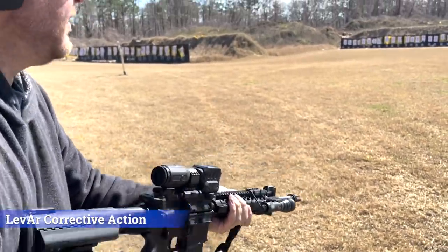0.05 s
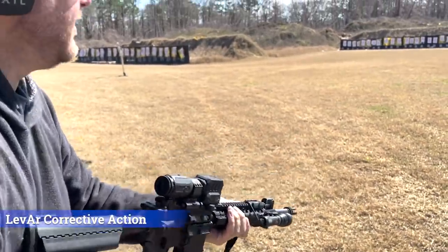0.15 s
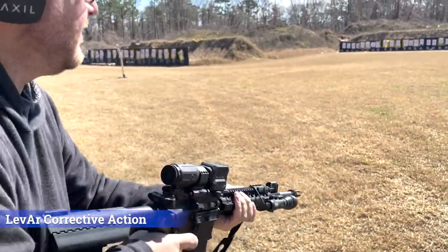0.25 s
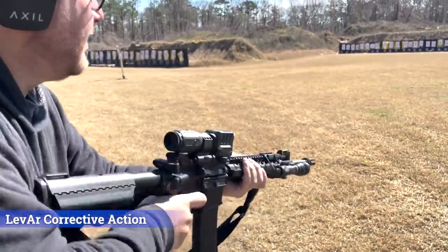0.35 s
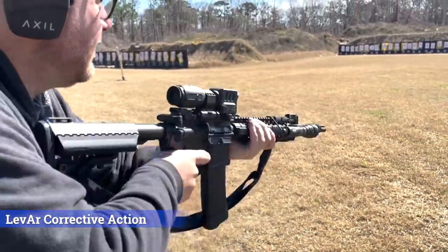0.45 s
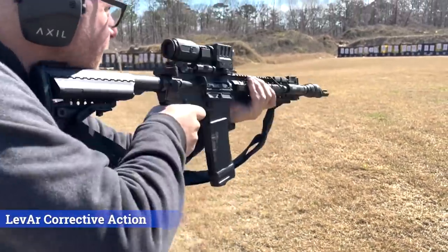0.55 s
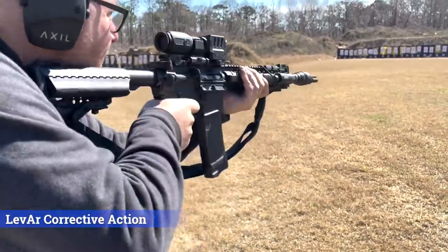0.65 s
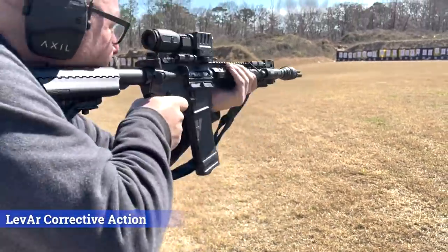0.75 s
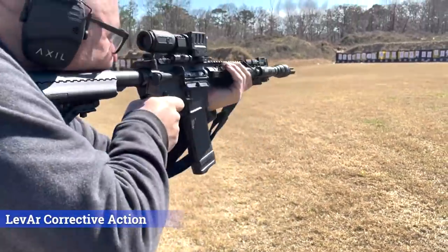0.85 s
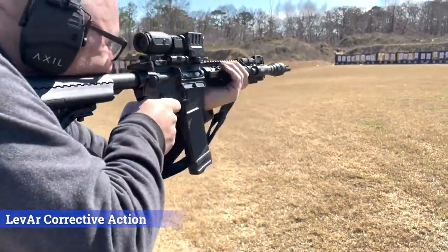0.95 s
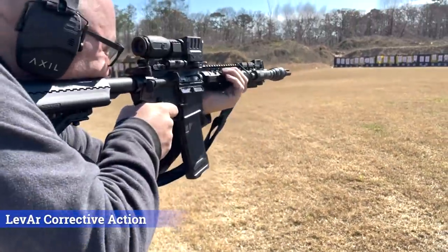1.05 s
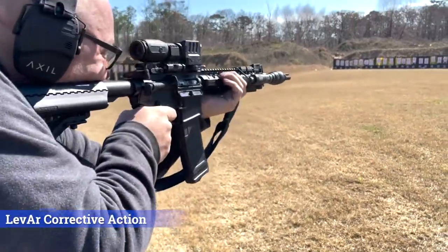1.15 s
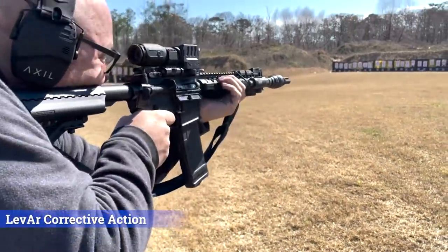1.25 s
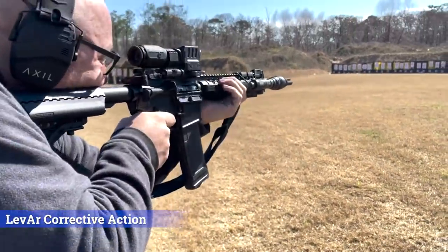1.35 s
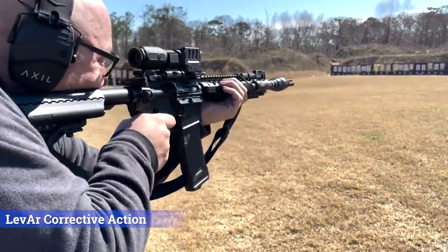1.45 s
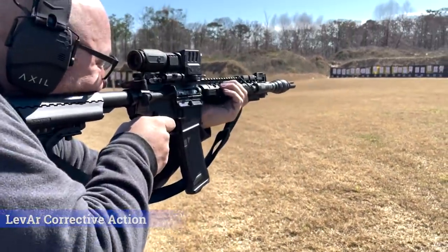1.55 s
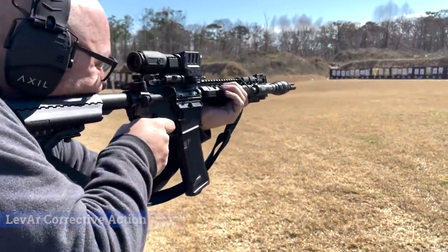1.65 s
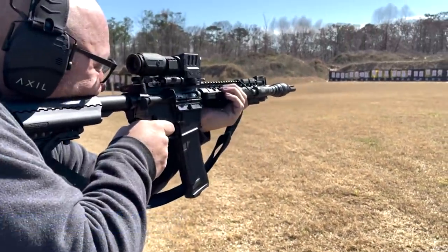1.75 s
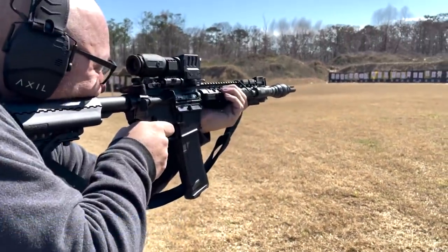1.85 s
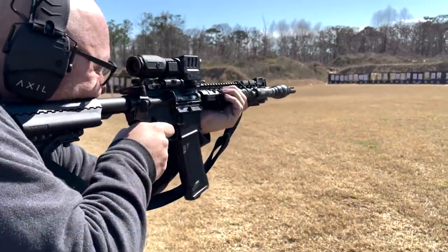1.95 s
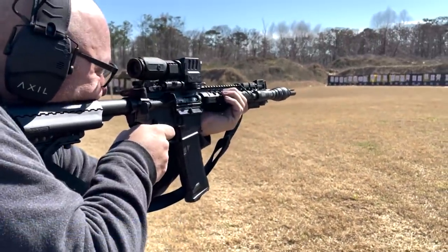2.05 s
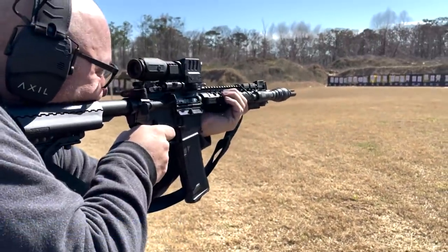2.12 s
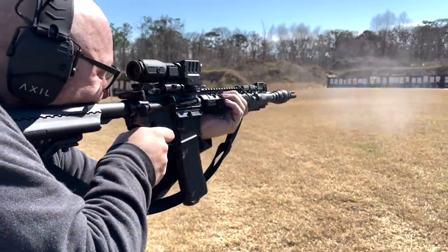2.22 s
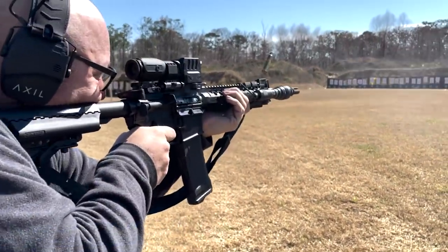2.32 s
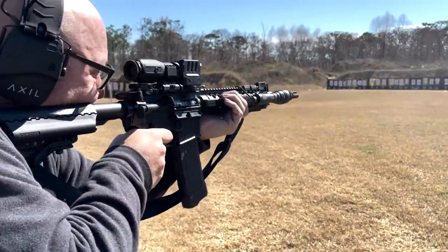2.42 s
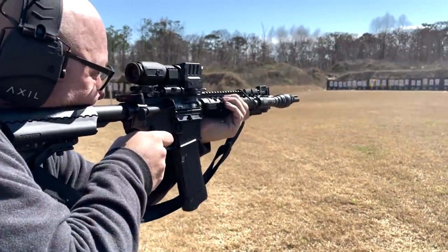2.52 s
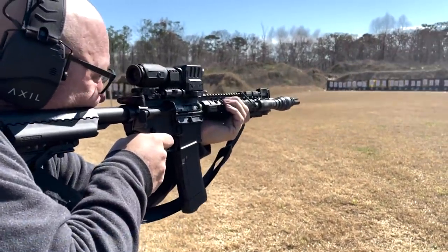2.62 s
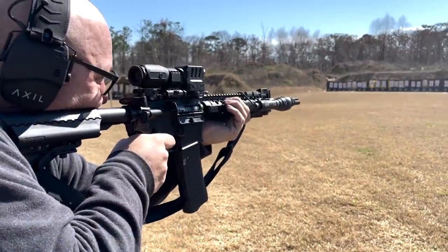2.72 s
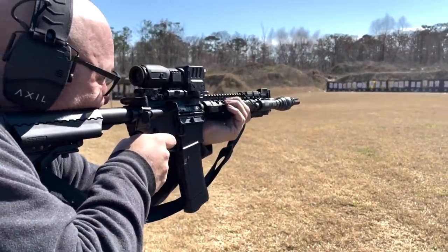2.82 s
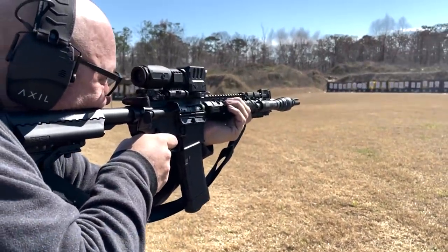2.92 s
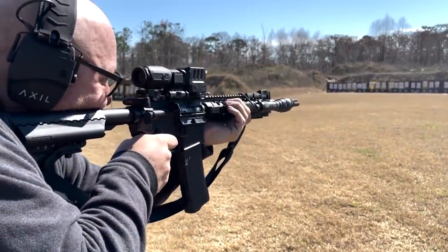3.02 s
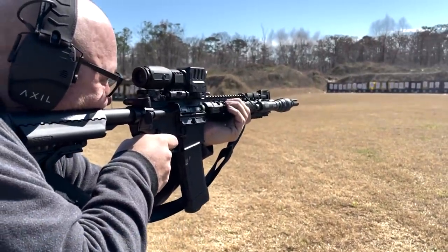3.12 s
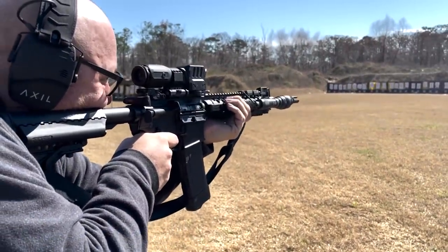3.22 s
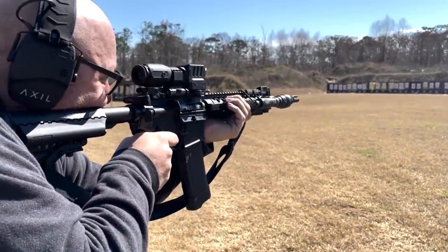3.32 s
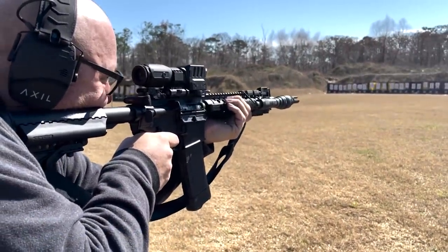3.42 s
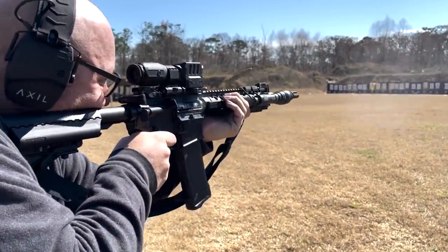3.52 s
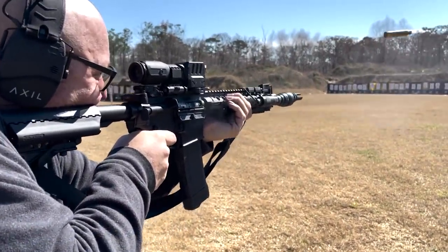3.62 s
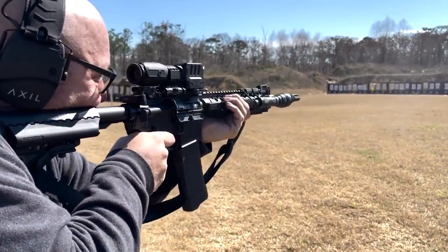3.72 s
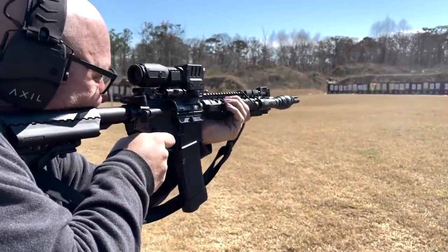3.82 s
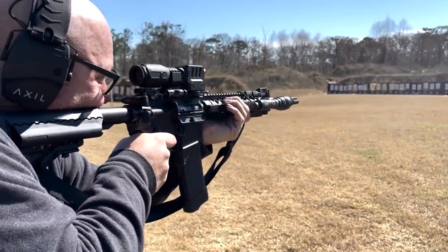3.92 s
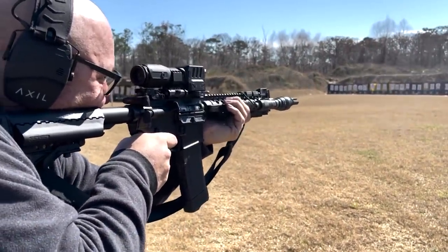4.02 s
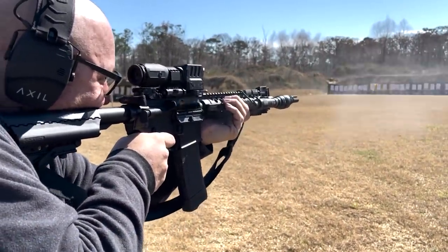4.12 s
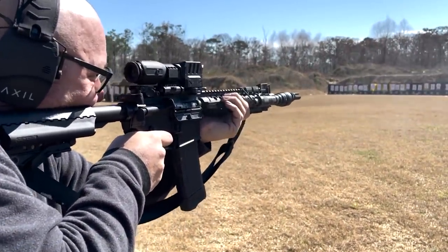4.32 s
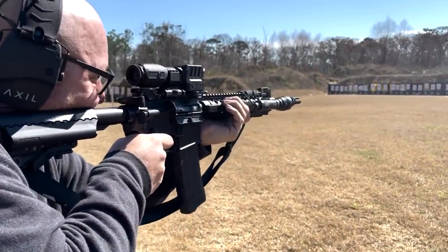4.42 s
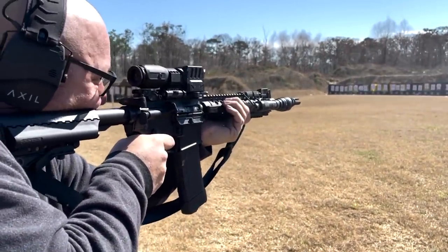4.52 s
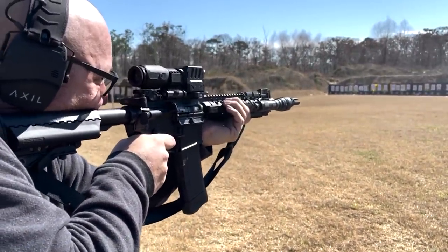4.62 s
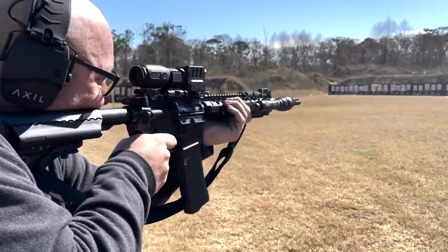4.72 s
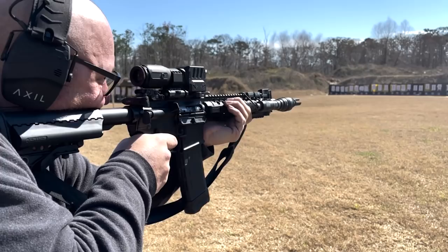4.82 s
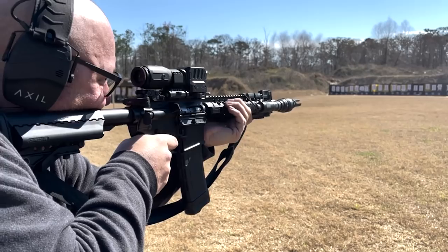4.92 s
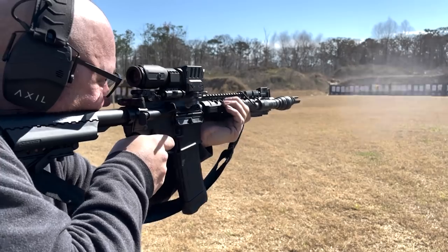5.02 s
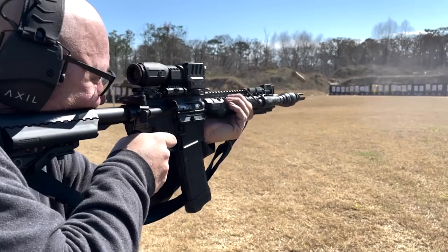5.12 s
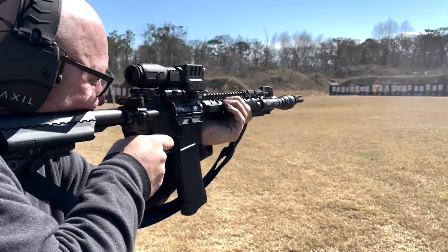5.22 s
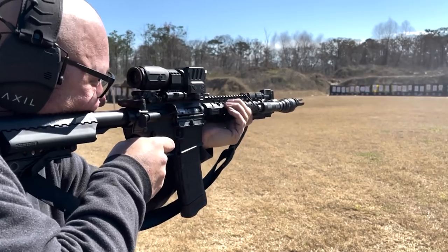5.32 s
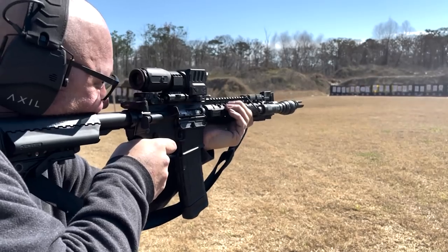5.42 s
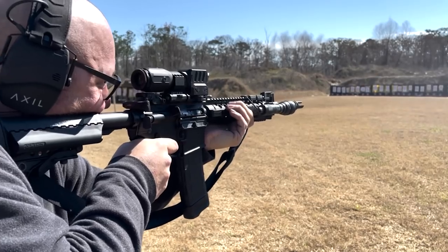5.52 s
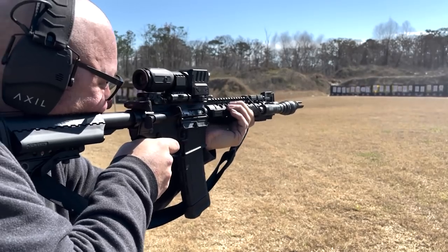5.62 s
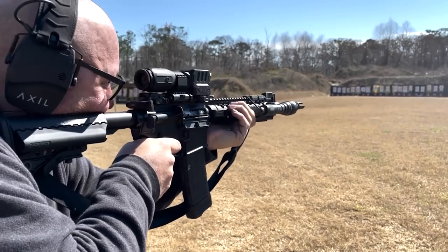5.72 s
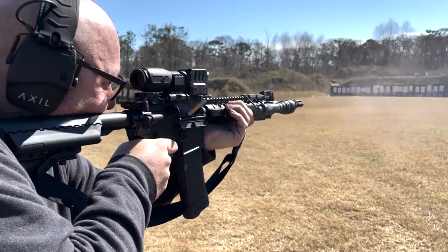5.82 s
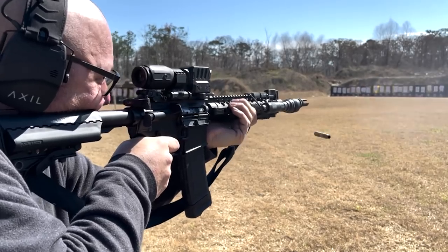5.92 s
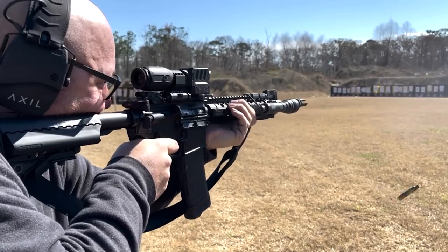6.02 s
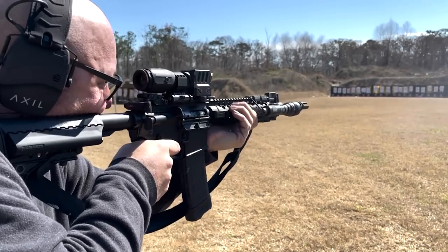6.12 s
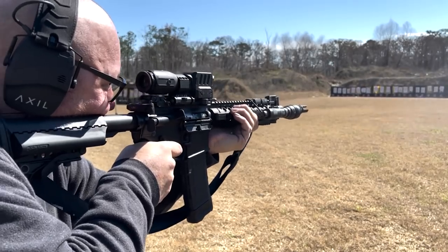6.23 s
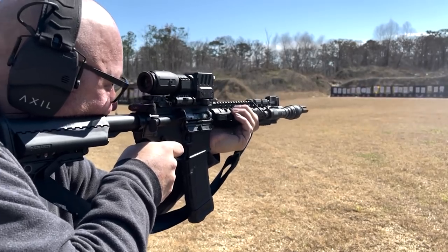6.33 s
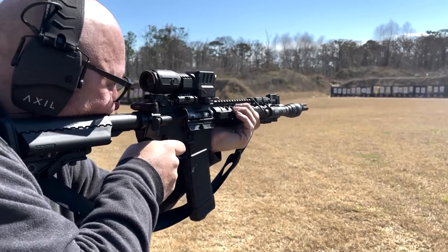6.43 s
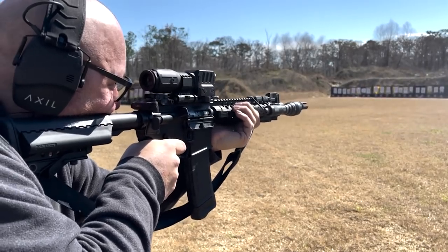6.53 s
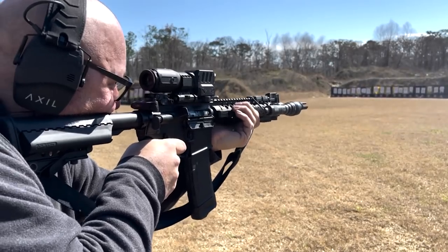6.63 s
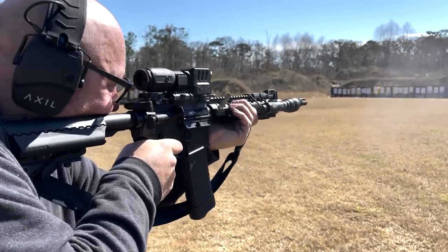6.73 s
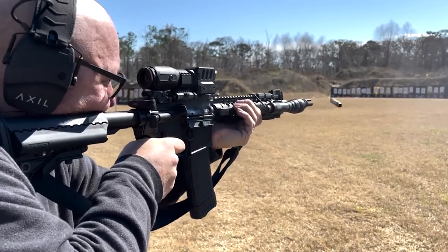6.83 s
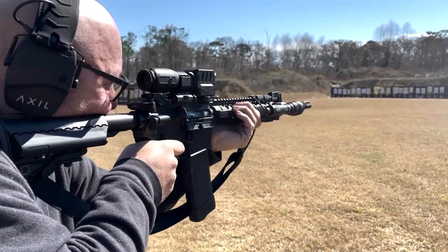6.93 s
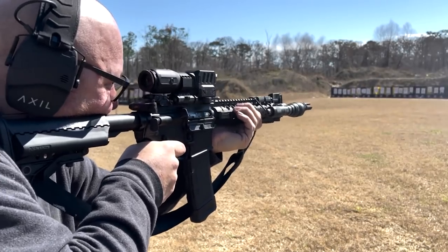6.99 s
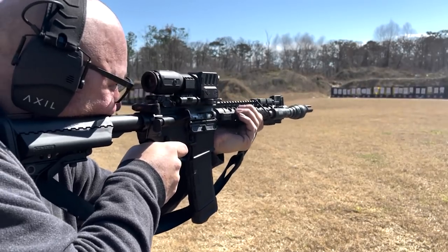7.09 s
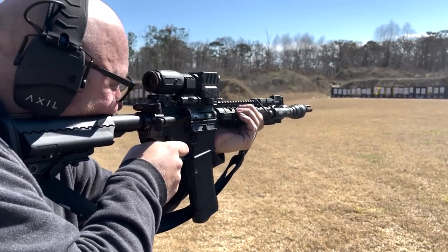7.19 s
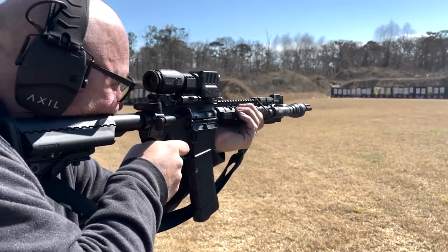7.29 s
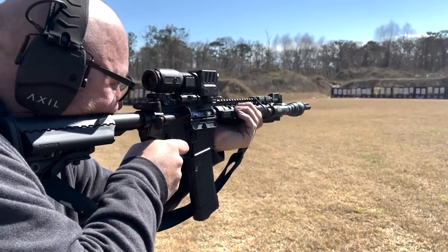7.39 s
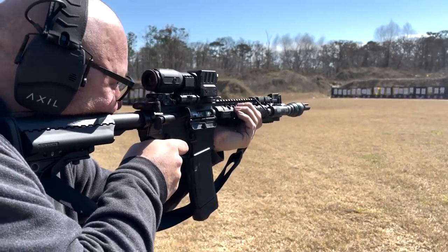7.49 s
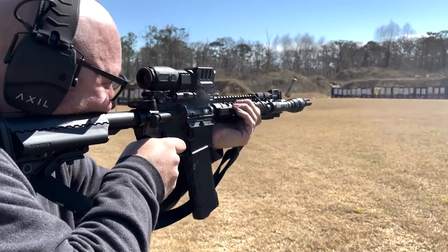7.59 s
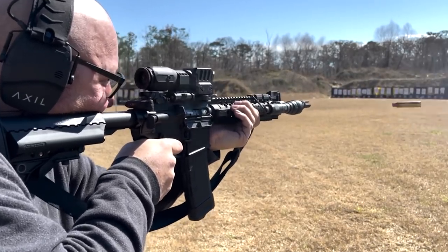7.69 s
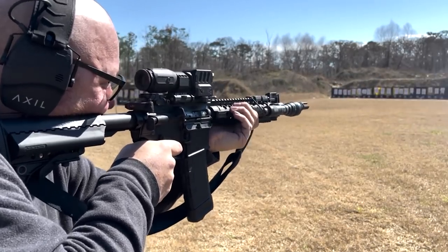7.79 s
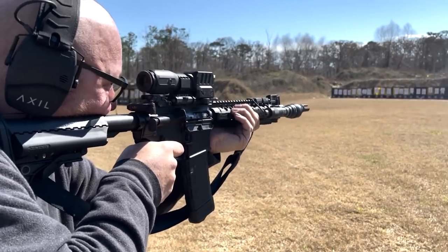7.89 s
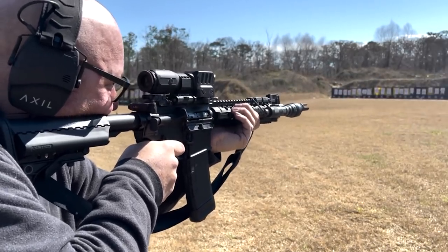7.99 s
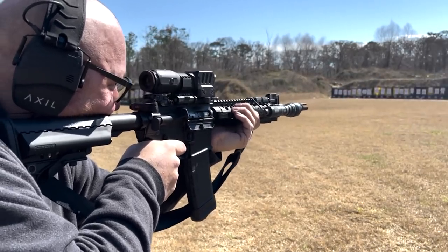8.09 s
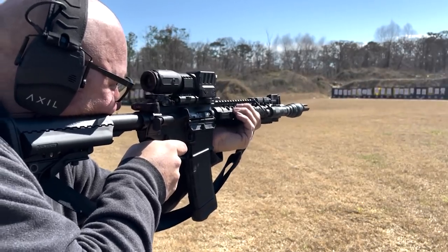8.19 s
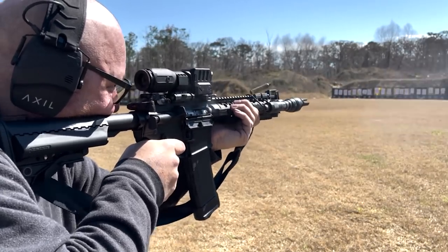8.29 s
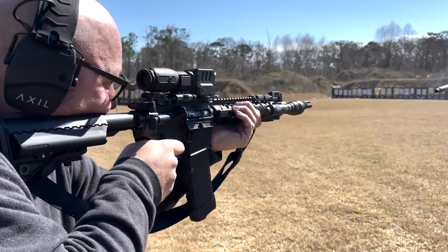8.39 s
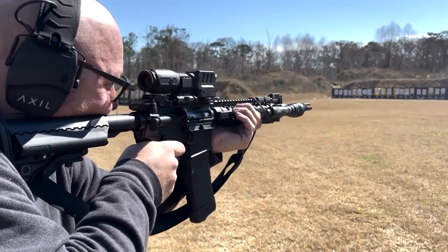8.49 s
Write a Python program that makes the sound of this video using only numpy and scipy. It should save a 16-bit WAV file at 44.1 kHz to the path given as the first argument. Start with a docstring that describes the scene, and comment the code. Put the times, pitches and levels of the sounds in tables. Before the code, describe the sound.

A semi-automatic rifle fires eight deafening, spaced shots beside the microphone on an open range, echoes rolling off trees and two bullets ringing distant steel.

```python
"""Rifle on a grass range

A semi-automatic rifle fires eight shots on open grass, an arm's length from a two-port microphone.
Each blast is a slab of noise that overloads the input; two berms answer and the tree line rolls on.
The bolt slams and the trigger clicks; two bullets ring a distant steel plate, a sum of decaying sines.
The first two shots are followed by a falling whoosh, a band of noise that sinks in pitch.
At first an earlier shot is still dying away, cloth rustles, a faint hiss follows and a gust brushes by."""
import sys
import numpy as np
from scipy import signal
from scipy.fft import rfft, irfft, next_fast_len
from scipy.io import wavfile
from scipy.ndimage import uniform_filter1d

SR = 44100
rng = np.random.default_rng(int(sys.argv[2]) if len(sys.argv) > 2 else 0)


def master_out(mix):
    """Clip the mix to full scale and print it as 16-bit PCM to the path in sys.argv[1]."""
    frames = np.transpose(np.atleast_2d(mix))
    ceiling = np.clip(frames, -1, 1)
    pcm = np.round(ceiling * 32767).astype(np.int16)
    wavfile.write(sys.argv[1], SR, pcm)


N = 377055  # length in samples

# Stereo sounds hold two rows until ports(): pressure common to both ports, and their difference.


def amp(db):
    """Turns decibels into an amplitude factor."""
    return 10 ** (np.asarray(db) / 20)


def unit(x):
    """Scales a sound to an RMS of 1."""
    return x / np.sqrt(np.mean(x ** 2) + 1e-20)


def clock(length):
    """Sample times in seconds for a sound of this length."""
    return np.arange(int(length * SR)) / SR


def read(points, hz):
    """Reads a curve of (Hz, value) points, interpolated over log frequency."""
    f, value = np.transpose(points)
    return np.interp(np.log(hz + 1), np.log(f + 1), value)


def add(mix, s, sound):
    """Mixes a stereo sound in at time s, cutting what falls outside."""
    start = round(s * SR)
    sound = sound[:, max(-start, 0):]
    part = mix[:, max(start, 0):][:, :sound.shape[1]]
    part += sound[:, :part.shape[1]]


def analyse(x, size=1024):
    """Splits a sound into frequency bands over time: Hz, seconds, complex values."""
    return signal.stft(x, SR, nperseg=size, noverlap=size * 3 // 4)


def resynthesise(z, size=1024):
    """Rebuilds a sound from its frequency bands over time."""
    return signal.istft(z, SR, nperseg=size, noverlap=size * 3 // 4)[1]


def bell(hz, centre_hz, width):
    """Bell-shaped band around a centre; width is in natural log of frequency."""
    return np.exp(-.5 * (np.log((hz[:, None] + 1) / centre_hz) / width) ** 2)


def colour(x, spectrum, rings=(), size=4096):
    """Minimum-phase filter of energy 1 from a spectrum and a few resonances."""
    hz = abs(np.fft.fftfreq(size, 1 / SR))
    db = read(spectrum, hz)
    for f, width, boost in rings:
        db = db + boost / (1 + (2 * (hz - f) / width) ** 2)
    # the Hilbert transform of the log level gives the causal phase
    response = np.exp(signal.hilbert(np.log(amp(db))).conj())
    taps = np.fft.ifft(response).real
    return signal.fftconvolve(x, taps[None] / np.linalg.norm(taps), axes=1)


def burst(noise, envelope, count=4):
    """Noise under an envelope, its spectrum repeatedly evened to fill the holes."""
    x = noise * envelope
    for _ in range(count):
        flat = irfft(np.exp(1j * np.angle(rfft(x))), len(envelope))
        x = flat * np.sqrt(envelope)
    return unit(x) * np.sqrt(np.mean(envelope ** 2))


def tick(db, spectrum, fall):
    """A short hard contact: a coloured noise burst with peak level db."""
    t = clock(.04)
    x = colour(burst(rng.standard_normal((2, len(t))), np.exp(-t / fall)), spectrum)
    return amp(db) * x / abs(x).max()


def blend(shared, fresh, likeness):
    """Mixes two unrelated sounds so that the result resembles the first by likeness."""
    c = np.clip(likeness, 0, 1)
    return c * shared + np.sqrt(1 - c ** 2) * fresh


def scatter(length, lumpy_db, grain_db, count=260):
    """Many small grains of noise in clumps about count samples long, a few standing out."""
    size = len(clock(length))
    clumps = unit(uniform_filter1d(rng.standard_normal(size), count))
    grains = np.minimum(rng.exponential(1, size), 4.5)
    strength_db = lumpy_db * clumps + grain_db * grains
    return unit(rng.standard_normal((2, size)) * amp(strength_db))


def dying(x, t60_by_hz):
    """Lets each band of a sound die away at its own speed."""
    hz, t, z = analyse(x, 512)
    return resynthesise(z * amp(-60 * t / read(t60_by_hz, hz)[:, None]), 512)


FIELD_S, FIELD_DB = 0.1, -7  # the open field answers first, and weakly
TREES_S, TREES_RISE_S = 0.17, 0.023  # delay of the tree line, and how gradually it sets in
FRONT_DB, FRONT_FADE_S = 5, .025  # its front row stands out


def terrain(age):
    """How much land answers at each delay: first the open field, then the tree line."""
    field = np.minimum(age / FIELD_S, 1) ** 2
    trees = np.clip(1 + (age - TREES_S) / TREES_RISE_S, 0, 1)
    front_db = FRONT_DB * np.exp(-np.maximum(age - TREES_S, 0) / FRONT_FADE_S)
    return field * amp(FIELD_DB * (1 - trees) + front_db * trees)


LATE_S = 0.32  # by this delay the gain reaches each shot's own late level
RISE_S, RISE_DB = .8, 2  # until this delay the gain rises a little more
FADING_DB_PER_S, FADING_DB = 8.5, 5.5  # then it falls at this rate, by this much at most


def late_course(age, late_db):
    """Gain of the late echoes: it moves to the late level, rises a little, then falls."""
    rise_db = np.interp(age, [TREES_S, LATE_S, RISE_S], [0, late_db, late_db + RISE_DB])
    fading_db = np.clip(FADING_DB_PER_S * (age - RISE_S), 0, FADING_DB)
    return amp(rise_db - fading_db)


# Tone of the tree line. Each row: frequency in Hz, relative level in dB per Hz.
ROLL_SPECTRUM = [(20, -33.5), (40, -13), (75, -5.5), (170, 4.5), (320, 4.5), (650, -3), (1200, -12.5),
                 (2400, -10.5), (4000, -15), (8500, -17.5), (11500, -16.5), (13500, -48), (16000, -55)]
# How long the tree line rolls on. Each row: frequency in Hz, time to fall by 60 dB in seconds.
ROLL_DECAY = [(60, 4.5), (220, 3.73), (500, 2.57), (1000, 4.06), (2500, 2.42), (4500, 1.446), (8000, 0.98),
              (12000, 0.75)]


def roll(reflections, level_db=-35):
    """The tree line throws the blast back; the air takes the treble from the longer paths."""
    x = dying(colour(reflections, ROLL_SPECTRUM), ROLL_DECAY)
    return x * amp(level_db) * terrain(np.arange(x.shape[1]) / SR)


# Echoes from the two berms. Each row: delay in seconds, peak in dB before late_course() scales it,
# lowest Hz, highest Hz.
BERM_ECHOES = [(.181, -23.5, 113, 705), (0.185, -26.5, 69.6, 252.2), (.5328, -25.5, 167.4, 478)]


def berms():
    """Earth banks return the blast as a dull thud: a band-passed impulse whose bass trails behind."""
    out = np.zeros((2, SR))
    for delay, db, low_hz, high_hz in BERM_ECHOES:
        band = signal.butter(N=3, Wn=[low_hz, high_hz], btype="band", fs=SR, output="sos")
        thud = signal.sosfilt(band, signal.unit_impulse(SR // 10))
        add(out, delay, amp(db) * np.outer([1, 0], thud / abs(thud).max()))
    return out


EARLIER_S, EARLIER_DB = -.75, 7  # a shot fired just before: start, gain of its roll
# The eight shots, an arm's length away. Each row: start in seconds, relative blast level in dB,
# boost to the body of the near scatter in dB, relative level of the late echoes in dB.
SHOT_LIST = [(2.2708, -0.5, -7.5, 10.5), (3.5021, 0.5, -5.5, 3), (4.1387, -.5, 2, 2), (5.0434, -2, 2, 1),
             (5.8370, -0.5, 1.5, 0), (6.7349, 0, 2, -0.5), (7.5575, -0.5, 2.5, -0.5), (8.254, 0, 2.5, -0.5)]
# Tone of the near scatter. Each row: frequency in Hz, relative level in dB per Hz.
NEAR_SPECTRUM = [(30, -10.5), (65, 0), (120, -11.5), (220, -4.5), (600, -1), (950, -4.5), (1300, -5),
                 (2300, -5.5), (4000, -11), (8600, -10), (11500, -11), (13600, -43.5), (15500, -38.5)]
# How long the near scatter lasts. Each row: frequency in Hz, time to fall by 60 dB in seconds.
NEAR_DECAY = [(60, 0.15), (200, 0.45), (700, 0.53), (2000, 0.31), (8000, 0.26)]


def echoes(near_db=-19, near_start=.012, body_hz=600, body_width_hz=900):
    """All shots share one reflection pattern; the body of the near scatter differs from shot to shot, and the
    late echoes sound louder after the first shots."""
    out = np.zeros((2, N))
    ground = scatter(0.45, lumpy_db=-1.5, grain_db=2.0)
    tree_roll = roll(scatter(2.4, lumpy_db=2.0, grain_db=3.0))
    far = tree_roll.copy()
    add(far, 0, berms())
    age = np.arange(far.shape[1]) / SR
    for s, _, body_db, late_db in SHOT_LIST:
        # the near scatter varies slightly
        reflections = blend(ground, rng.standard_normal(ground.shape), 0.95)
        near = colour(reflections, NEAR_SPECTRUM, [(body_hz, body_width_hz, body_db)])
        add(out, s + near_start, amp(near_db) * dying(near, NEAR_DECAY))
        add(out, s, far * late_course(age, late_db))
    add(out, EARLIER_S, amp(EARLIER_DB) * tree_roll)
    return out


AIR_DB = -65
# Hush of the open range. Each row: frequency in Hz, relative level in dB per Hz.
AIR_SPECTRUM = [(25, -44.5), (60, -15), (150, -5), (300, -5.5), (550, -0.5), (830, 0), (1100, -5),
                (1600, -18), (2200, -31), (3000, -44.5), (8000, -45.5), (15000, -57.5)]
# Course of the gust at the microphone. Each row: time in seconds, relative level in dB.
GUST_COURSE = [(0.8, -65.5), (0.902, -52.5), (0.942, -57.5), (1.032, -49.5), (1.054, -55), (1.27, -58.5),
               (1.374, -43), (1.518, -57), (1.552, -82.5), (1.58, -75.5)]
# Tone of the wind on the microphone. Each row: frequency in Hz, relative level in dB.
BUFFET_SPECTRUM = [(20, -4.5), (50, -3.5), (90, -4), (150, -13.5), (300, -28.5), (1000, -69.5)]


def outdoors(gust_db=1, gust_edge=.03):
    """A steady hush of filtered noise, and one lumpy gust of low noise on the microphone."""
    hush = unit(colour(rng.standard_normal((2, N)), AIR_SPECTRUM)[:, :N])
    wind = unit(colour(rng.standard_normal((2, N)), BUFFET_SPECTRUM)[:, :N])
    t = np.arange(N) / SR
    s, db = np.transpose(GUST_COURSE)
    # 1 within the gust, fading on either side
    blowing = np.exp(-abs(t - np.clip(t, s[0], s[-1])) / gust_edge)
    return amp(AIR_DB) * hush + blowing * amp(gust_db + np.interp(t, s, db)) * wind


# Short cloth rustles, then a long faint hiss. Each row: start in seconds, length in seconds,
# level in dB before its swell.
RUSTLES_AND_HISS = [(0, .06, -78), (0.125, 0.096, -70), (0.247, .11, -65.5), (0.356, 0.68, -74.5)]
# Tone of the rustles and the hiss. Each row: frequency in Hz, relative level in dB.
RUSTLE_SPECTRUM = [(500, -11.5), (2500, 2.5), (5000, -9), (8500, -5.5), (11500, -5), (13000, -35)]
# Loose parts click as the rifle is handled. Each row: start in seconds, peak level in dB.
LOOSE_CLICKS = [(.1432, -49), (.305, -57), (1.0376, -63), (2.646, -32.5), (2.913, -53), (3.3205, -49),
                (4.629, -51.5), (8.5281, -41)]
# The bolt slams home about 70 ms after each shot. Each row: start in seconds, relative peak in dB.
BOLT_SLAMS = [(2.346, -12.5), (3.5802, -16.5), (4.2052, -13), (5.119, -14.5), (5.903, -17.5),
              (6.8042, -17.5), (7.6243, -14), (8.3211, -12.5)]
# The trigger resets about a quarter of a second after each shot. Each row: start in seconds,
# relative peak in dB.
TRIGGER_RESETS = [(2.5446, -32), (3.777, -35), (4.4106, -39.5), (5.2686, -36.5), (6.0651, -37),
                  (6.9888, -36.5), (7.7932, -37), (8.4957, -38)]
# Tone of small steel parts. Each row: frequency in Hz, relative level in dB.
CLICK_SPECTRUM = [(200, -18), (1500, -20), (3500, -6.5), (6000, -3), (9000, -2), (11500, -5), (13500, -38),
                  (15500, -38.5)]


def handling(bolt_db=3.5, reset_db=4.0):
    """Bolt, trigger and loose parts click as noise bursts, with rustles and a hiss of grainy noise."""
    out = np.zeros((2, N))
    for s, length, db in RUSTLES_AND_HISS:
        t = clock(length)
        grains = colour(scatter(length, lumpy_db=0.5, grain_db=3), RUSTLE_SPECTRUM)[:, :len(t)]
        add(out, s, amp(db) * unit(grains) * np.sin(np.pi * t / length))
    for s, db in LOOSE_CLICKS:
        add(out, s, tick(db, CLICK_SPECTRUM, fall=0.0044))
    for s, db in BOLT_SLAMS:
        add(out, s, tick(bolt_db + db, CLICK_SPECTRUM, fall=0.0016))
    for s, db in TRIGGER_RESETS:
        add(out, s, tick(reset_db + db, CLICK_SPECTRUM, fall=.003))
    return out


# Tone of the blast at arm's length. Each row: frequency in Hz, relative level in dB per Hz.
BLAST_SPECTRUM = [(30, -15), (90, -6), (200, -1), (300, -7), (700, -1), (1000, -2.5), (1200, -10.5),
                  (2500, -14.5), (5500, -16), (8600, -11), (11500, -10.5), (12800, -32), (13800, -54),
                  (15500, -46.5)]
# Resonances that colour the blast. Each row: frequency in Hz, width in Hz, boost in dB.
BLAST_RINGS = [(195, 88, 4.5), (392, 55, 3), (510, 80, -2.5), (630, 120, 4), (938, 40, 7), (1680, 33, 10.5),
               (1930, 93, 7), (2300, 80, 4.5)]


def muzzle(blast_db=-7.6, attack=0.0013, hold=.0105, fall=.0034, uneven_db=4, uneven_hz=400, lag_hz=220):
    """Each blast with its bounces off rifle and ground: a dense slab of pressure that ends quickly."""
    out, t = np.zeros((2, N)), clock(.04)
    slab = np.minimum((t + 1 / SR) / attack, 1) * np.exp(-np.maximum(t - hold, 0) / fall)
    pattern = rng.standard_normal((2, len(t)))
    pole = np.exp(-2 * np.pi * lag_hz / SR)
    for s, db, *_ in SHOT_LIST:
        noise = blend(pattern, rng.standard_normal(pattern.shape), .85)
        blast = colour(burst(noise, slab), BLAST_SPECTRUM, BLAST_RINGS)
        # all-pass: the bass of the blast trails its crack by a millisecond or two
        blast = signal.lfilter([-pole, 1], [1, -pole], blast)
        # so close to the muzzle, the gas pushes unequally on the two ports
        blast[1] += amp(uneven_db) * signal.lfilter(*signal.butter(1, uneven_hz, fs=SR), blast[1])
        add(out, s, amp(blast_db + db) * blast)
    return out


SINK_S, SINK_TO_HZ = 0.22, 215  # time constant, and the low rumble it approaches


def sinking(age, start_hz):
    """Pitch of a whoosh at a given age: it sinks ever more slowly."""
    return SINK_TO_HZ + (start_hz - SINK_TO_HZ) * np.exp(-np.maximum(age, 0) / SINK_S)


SWELL_S, SWELL_DB, FADE_DB_PER_S = 0.12, 10, 8  # it swells by SWELL_DB, then fades
# Falling whooshes after the first two shots. Each row: start in seconds, length in seconds,
# starting pitch in Hz, level in dB at the top of the swell.
WHOOSH_LIST = [(2.312, 0.94, 1817, -40), (3.548, 0.45, 1520, -44)]


def whooshes(width=0.14, release=.08):
    """A band of noise that sinks in pitch, swells and fades."""
    out = np.zeros((2, N))
    for s, length, start_hz, db in WHOOSH_LIST:
        t = clock(length)
        hz, age, z = analyse(rng.standard_normal((2, 2 * SR)))
        pitch = sinking(age, start_hz)
        # the root evens the power as the band narrows in Hz
        band = bell(hz, pitch, width) / np.sqrt(pitch)
        x = unit(resynthesise(z * band)[:, :len(t)])
        swell_db = np.minimum(SWELL_DB * (t / SWELL_S - 1), FADE_DB_PER_S * (SWELL_S - t))
        add(out, s, x * amp(db + swell_db) * np.minimum((length - t) / release, 1))
    return out


def hollowed(x, depth_db=18, below=0.52, width=0.38, lasts=.42, opens=0.017, closes=.1):
    """Just under each falling whoosh a hollow sweeps down through the echoes."""
    hz, t, z = analyse(x)
    for s, _, start_hz, _ in WHOOSH_LIST:
        age = t - s
        notch = bell(hz, below * sinking(age, start_hz), width)
        opening = np.clip(np.minimum(age / opens, (lasts - age) / closes), 0, 1)
        z = z * amp(-depth_db * notch * opening)
    return resynthesise(z)[:, :N]


DIP_S, DIP_LENGTH_S, DIP_DB = 3.385, .11, -22  # start, length and depth, before the second shot


def dipped(x, centre_hz=620, width=0.82):
    """The mids of the echoes drop away for a moment, by a bell-shaped cut."""
    hz, t, z = analyse(x)
    during = (t > DIP_S) & (t < DIP_S + DIP_LENGTH_S)
    return resynthesise(z * amp(DIP_DB * bell(hz, centre_hz, width) * during))[:, :N]


KNOCK_S = .17  # delay of the dull knock after each hit
# Bullets on the distant plate. Each row: start in seconds, smack peak in dB, ring level in dB,
# ring tilt in dB per octave.
HIT_LIST = [(4.5106, -11, -42.5, 3), (5.4168, -23, -60, 9.5)]
# Modes of the plate. Each row: frequency in Hz, relative level in dB, time to fall by 60 dB in seconds.
PLATE_MODES = [(2710, -3, 0.4), (2760, -2.5, 0.5), (4394, -12.5, .35), (5220, -13.5, .35), (7400, -16, .4),
               (8040, -25, .4), (8000, -19.5, .3), (8350, -24.5, .4), (8930, -21.5, 0.4),
               (11000, -27, 0.44)]
# Tone of the smack. Each row: frequency in Hz, relative level in dB.
SMACK_SPECTRUM = [(100, -16.5), (300, -9.5), (650, 4.5), (1400, -17), (1950, -9.5), (2500, -24.5),
                  (3300, -10.5), (4300, -28), (8500, -26.5), (11500, -36), (13500, -72)]
# Tone of its dull echo. Each row: frequency in Hz, relative level in dB.
KNOCK_SPECTRUM = [(300, -23), (1100, 0.5), (1500, -5.5), (2500, -27.5), (8000, -53)]


def plate(splash_db=-26, splash_t60=.3, echo_db=-19):
    """A bullet smacks the steel, which rings on over a short splash of echoes and a dull knock."""
    out, t = np.zeros((2, N)), clock(0.6)
    for s, db, ring_db, tilt_db in HIT_LIST:
        ring = np.zeros(len(t))
        for hz, mode_db, t60 in PLATE_MODES:
            # a hit near the edge favours the upper modes
            edge_db = tilt_db * np.log2(hz / PLATE_MODES[0][0])
            ring += amp(mode_db + edge_db - 60 * t / t60) * np.sin(2 * np.pi * hz * t)
        splash = colour(rng.standard_normal((2, len(t))) * amp(-60 * t / splash_t60), SMACK_SPECTRUM)
        add(out, s, tick(db, SMACK_SPECTRUM, fall=0.0026))
        add(out, s, amp(ring_db) * np.outer([1, 0], ring))
        add(out, s, amp(db + splash_db) * splash)
        add(out, s + KNOCK_S, tick(db + echo_db, KNOCK_SPECTRUM, fall=0.0074))
    return out


# The two microphone ports. Each row: frequency in Hz, phase lead of the left in radians.
PHASE_LEAD = [(20, 0.5), (250, 0.17), (700, 0.5), (1100, 1.84), (1500, 1.76), (2000, -1), (3200, 0.6),
              (6500, 0.6), (7800, 0.1), (8650, 1), (9400, -2), (10200, -3), (11800, -5.5)]
# How alike the ports hear. Each row: frequency in Hz, likeness where 1 is the same.
LIKENESS = [(40, 0.75), (110, 0.96), (220, 0.94), (500, 0.84), (850, .6), (1300, 0.073), (2000, 1),
            (3000, .9), (7000, 1), (12000, 0.66)]


def ports(x):
    """Turns common pressure and difference into left and right, with phase and likeness by frequency."""
    size = next_fast_len(N + SR // 10)
    hz = np.fft.rfftfreq(size, 1 / SR)
    common, apart = rfft(x, size)
    share = np.sqrt((1 + read(LIKENESS, hz)) / 2)
    turn = np.exp(.5j * read(PHASE_LEAD, hz))
    left = blend(common, apart, share) * turn
    right = blend(common, -apart, share) / turn
    return irfft(np.array([left, right]), size)[:, :N]


def scene():
    """All sources, heard through the pair of ports."""
    reflections = dipped(hollowed(echoes()))
    return ports(reflections + outdoors() + handling() + muzzle() + whooshes() + plate())


CEILING = .8  # the input saturates towards this share of full scale
EDGE_HZ = 16400  # upper band limit


def record(dry):
    """The input rounds off the peaks of the blasts; then the band limit."""
    squashed = CEILING * np.tanh(dry / CEILING)
    lowpass = signal.firwin(255, EDGE_HZ, window=("kaiser", 9), fs=SR)
    return signal.oaconvolve(squashed, lowpass[None], "same")


dry = scene()
out = record(dry)
master_out(out)
```